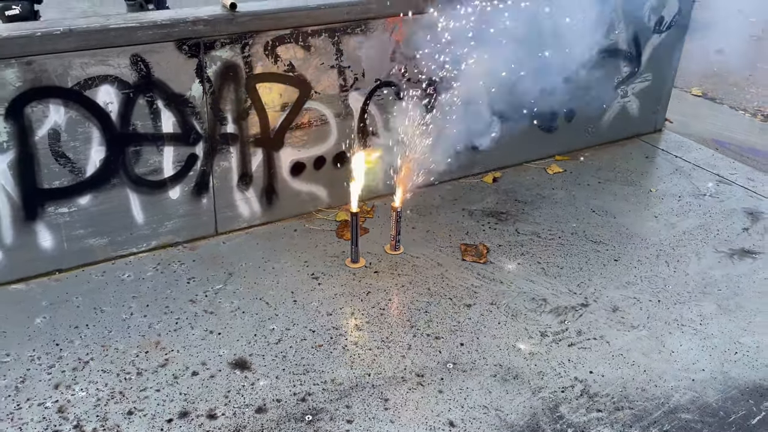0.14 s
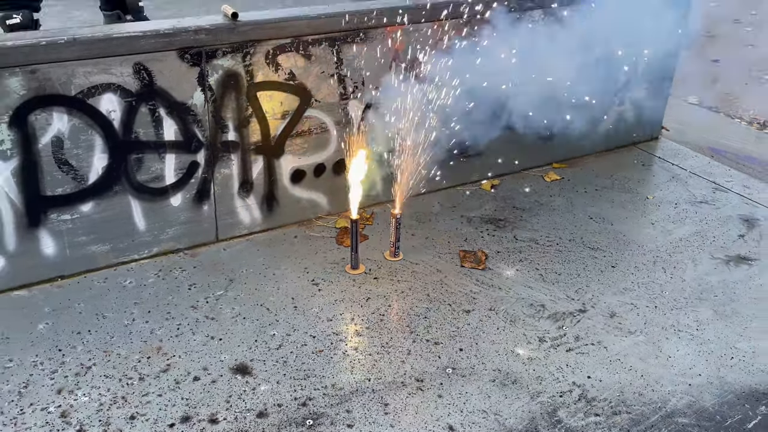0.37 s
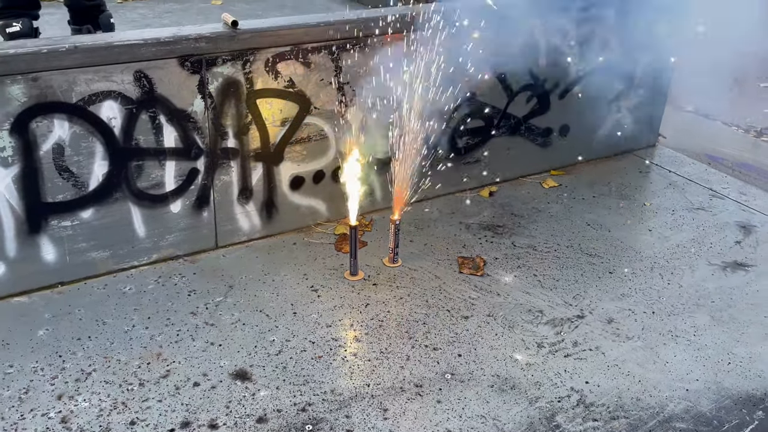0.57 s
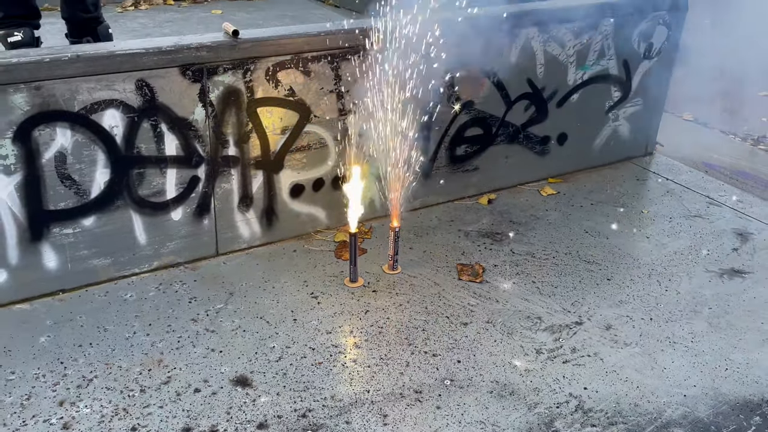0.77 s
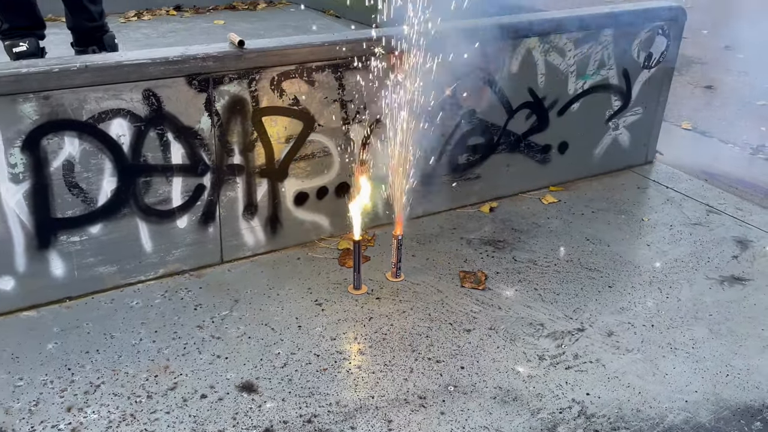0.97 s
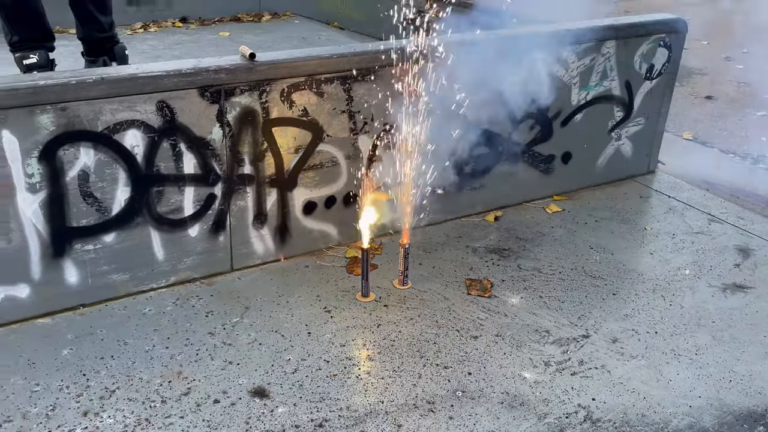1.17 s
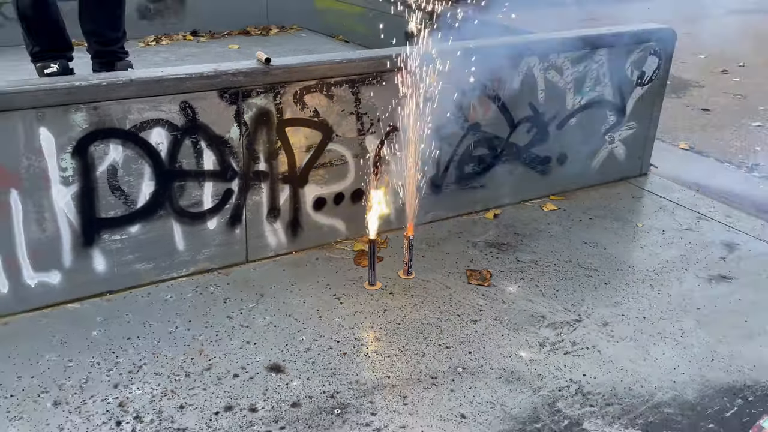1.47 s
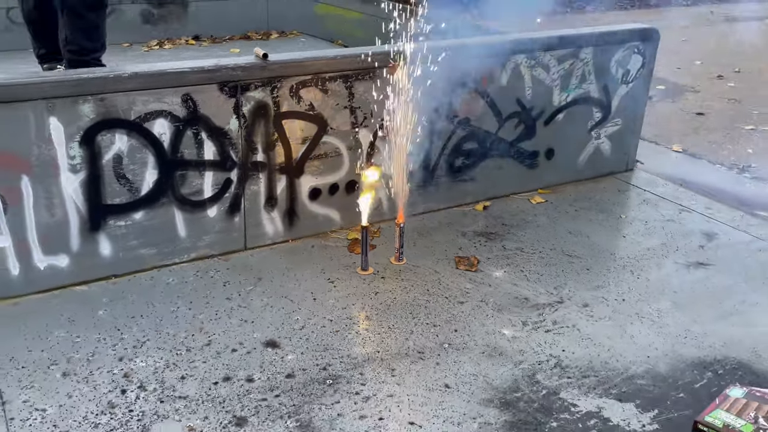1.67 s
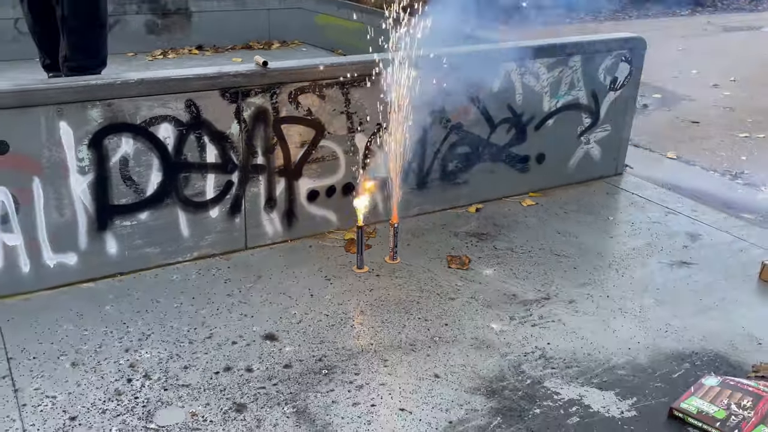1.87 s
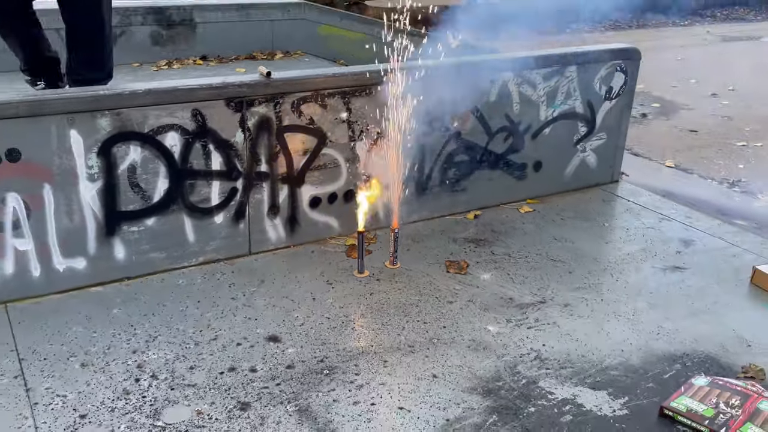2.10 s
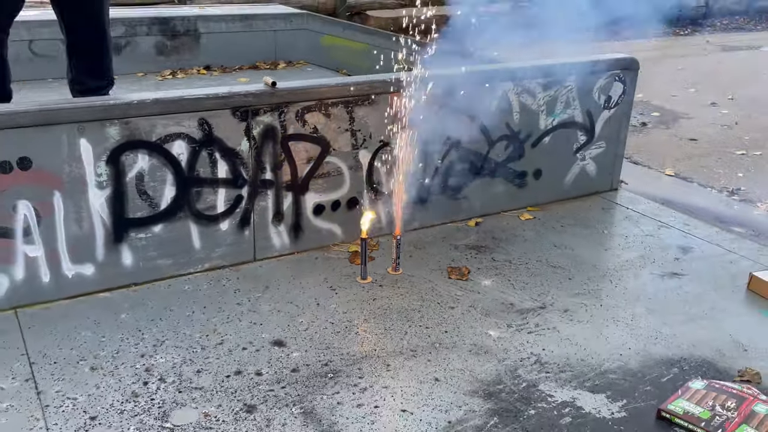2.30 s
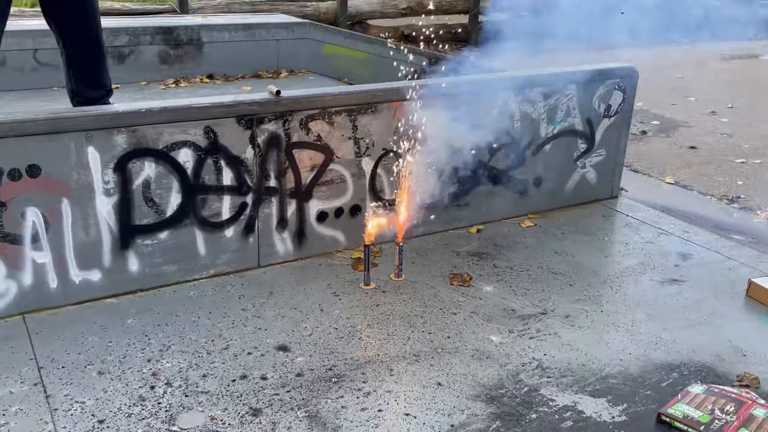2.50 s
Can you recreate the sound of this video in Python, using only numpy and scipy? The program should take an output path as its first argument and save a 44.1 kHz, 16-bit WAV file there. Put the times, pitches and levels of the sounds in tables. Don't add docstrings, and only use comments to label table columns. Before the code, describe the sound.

Fountain firework whistles loudly, its shrill pitch sinking, after a burst of spark hiss, with pops

```python
import sys
import numpy as np
from scipy import signal
from scipy.fft import rfft, irfft, next_fast_len
from scipy.io import wavfile

SR = 44100
rng = np.random.default_rng(int(sys.argv[2]) if len(sys.argv) > 2 else 0)


def store_wav(level_fs):
    pcm = np.round(np.clip(np.atleast_2d(level_fs), -1, 1) * 32767)
    wavfile.write(sys.argv[1], SR, pcm.T.astype(np.int16))


def gain_from_decibels(decibels):
    exponent = np.asarray(decibels, float) / 20
    return 10 ** exponent


N = 116865

# time in seconds, pitch in Hz, fundamental in dB, overtone drive in dB.
WHISTLE_COURSE = [(.46, 4240, -25, -56), (0.483, 4297, -27, -52), (.488, 4264, -19.5, -47),
                  (.51, 4224, -14, -39.5), (.55, 4154, -15.5, -53), (.60, 4200, -17, -45.5),
                  (.64, 4221, -17, -45), (0.691, 4127, -15.5, -45.5), (.70, 4217, -17.5, -50),
                  (.73, 4176, -19, -56), (.775, 4137, -15.5, -48), (0.786, 4125, -17.5, -57.5),
                  (.815, 4118, -19, -45), (.84, 4154, -17, -48.5), (.90, 4117, -18, -49.5),
                  (0.924, 4052, -22.5, -42), (.955, 4160, -17.5, -49), (1.02, 4060, -21, -42.5),
                  (1.035, 4070, -27.5, -40.5), (1.10, 4020, -32.5, -43.5), (1.135, 3940, -16, -40.5),
                  (1.18, 3921, -17.5, -41.5), (1.188, 3893, -18, -49), (1.211, 3890, -18, -45.5),
                  (1.23, 3750, -15, -51), (1.247, 3759, -15.5, -56), (1.256, 3723, -19, -59.5),
                  (1.385, 3669, -23.5, -50.5), (1.409, 3627, -27, -48.5), (1.52, 3583, -22, -45.5),
                  (1.6, 3520, -26, -44.5), (1.629, 3510, -29.5, -43), (1.66, 3503, -26.5, -47),
                  (1.8, 3383, -31.5, -45.5), (1.932, 3336, -34.5, -45), (1.99, 3310, -32.5, -39.5),
                  (2.004, 3268, -25, -42.5), (2.051, 3250, -23, -45.5), (2.13, 3219, -23, -47.5),
                  (2.191, 3250, -28.5, -50), (2.25, 3223, -25.5, -52.5), (2.38, 3221, -28.5, -55.5),
                  (2.419, 3240, -33.5, -59), (2.45, 3256, -41.5, -71.5), (2.485, 3270, -57, -80)]


def rms_one(x):
    return x / np.sqrt(np.mean(x ** 2) + 1e-20)


def in_time(rows):
    s, *columns = np.transpose(rows)
    return [np.interp(np.arange(N) / SR, s, c) for c in columns]


def at_hz(points, hz):
    return np.interp(np.log(hz), np.log(np.array(points)[:, 0]), np.array(points)[:, 1])


def lowpass(x, hz, order):
    return signal.sosfilt(signal.butter(order, hz, fs=SR, output="sos"), x)


def bandpass(x, low, high):
    return signal.sosfilt(signal.butter(2, [low, high], "band", fs=SR, output="sos"), x)


def drift(rate):
    r = np.exp(-40 * np.pi * rate / SR)
    slow = signal.lfilter([1], [1, -2 * r, r * r], rng.standard_normal(N // 20 + 2002))
    slow = slow[2000:]
    return np.interp(np.arange(N) / 20, np.arange(len(slow)), rms_one(slow - slow.mean()))


def banded_noise(spectrum, patchy_db, shared, tilt_db=0):
    out, together = 0, drift(18)
    edges = 28 * 2 ** np.arange(0, 9.3, 1 / 3)
    white = rng.standard_normal((2, N))
    for k, (low, high) in enumerate(zip(edges, edges[1:])):
        hz = np.sqrt(low * high)
        if spectrum[0][0] < hz < spectrum[-1][0]:
            band = bandpass(white[k % 2], low, high)
            flicker_db = patchy_db * (shared * together + drift(27))
            out = out + band * gain_from_decibels(at_hz(spectrum, hz) + tilt_db * np.log2(hz / 2000) + flicker_db)
    top = signal.cheby2(8, 30, 13700 * 1.05, fs=SR, output="sos")
    return rms_one(signal.sosfilt(top, out))


def noise_around(phase, puffs):
    return rms_one(puffs[0] * np.sin(phase) + puffs[1] * np.cos(phase))


def ground(x):
    bounce_s, bounce_db, dull_hz = 0.001009, -5, 6400
    lag = np.arange(N) - bounce_s * SR
    dull = lowpass(x, dull_hz, 1)
    return x + gain_from_decibels(bounce_db) * np.interp(lag, np.arange(N), dull)


def wall(x):
    level_db, t60_s, low_hz, high_hz = -24.5, .3, 1200, 6740
    t = np.arange(int(.3 * SR)) / SR
    tail = rng.standard_normal((2, len(t))) * gain_from_decibels(-60 * t / t60_s) * (t > .003)
    tail = bandpass(tail / np.sqrt(np.sum(tail ** 2) / 2), low_hz, high_hz)
    return gain_from_decibels(level_db) * signal.fftconvolve(x[None], tail, axes=1)[:, :N]


def ports(x):
    # frequency in Hz, phase by which left leads in radians.
    left_lead = [(0, .16), (500, .14), (1100, 0), (1700, -.7), (1850, .8), (2150, .03), (2800, .55),
                 (3200, .5), (4000, .1), (5000, .55), (5700, 0), (6800, -.8), (7900, -3.0), (8200, -3.14),
                 (10000, -4.95), (11200, -6.2), (12200, -6.4), (14200, -8.9), (14600, -9.1), (15200, -9.6),
                 (15700, -10.8), (16200, -11)]
    # frequency in Hz, left over right in dB.
    left_tilt = [(60, 0), (500, 1.3), (1650, 1.5), (3300, 2), (5000, 1.5), (15000, 1)]
    size = next_fast_len(N + 4096)
    hz = np.arange(size // 2 + 1) * SR / size + 1
    lead = np.interp(hz, *np.transpose(left_lead))
    half = np.exp(.5j * lead) * gain_from_decibels(.5 * at_hz(left_tilt, hz))
    return np.array([irfft(rfft(x, size) * h, size)[:N] for h in (half, 1 / half)])


def rumble():
    level_db, top_hz, swing_db = -70, 81, -0.5
    low = bandpass(rng.standard_normal(N), 35, top_hz)
    return gain_from_decibels(level_db + swing_db * drift(5.6)) * rms_one(low)


def air():
    # frequency in Hz, level in dB per Hz.
    air_spectrum = [(18, -54), (30, -38.5), (137, -1.5), (290, -6.5), (400, -26), (2400, -28.5), (3100, 1),
                    (3800, -7), (4600, -19.5), (14000, -21.5)]
    return gain_from_decibels(-62) * banded_noise(air_spectrum, patchy_db=1.5, shared=.15) + rumble()


def sparks():
    # start in seconds, peak in dB.
    spark_events = [(0.9384, -29), (1.0036, -41), (1.5025, -43), (1.577, -43), (1.6341, -54), (1.8073, -38),
                    (1.83, -32.5), (1.8576, -35), (1.8947, -39.5), (1.9548, -35.5), (2.143, -43),
                    (2.185, -40), (2.2043, -40.5)]
    gain_db, rise_s, lag_s = 3.5, .0011, .0025
    out, t = np.zeros(N), np.arange(441) / SR
    hz = 0.912 * in_time(WHISTLE_COURSE)[0]
    spurt = t / rise_s * np.exp(1 - t / rise_s)
    for s, db in spark_events:
        i = int((s + lag_s) * SR)
        tone = np.sin(2 * np.pi * hz[i] * t + rng.uniform(0, 5.7))
        out[i:i + len(t)] += gain_from_decibels(db + gain_db) * spurt * tone
    return out


def spitting():
    # time in seconds, level in dB.
    spit_course = [(.3, -87), (.36, -40.5), (.385, -25.5), (.41, -32.5), (.47, -35.5), (.515, -29),
                   (.55, -36.5), (.6, -34.5), (.72, -91)]
    spits_per_s, low_hz, high_hz = 4000, 2600, 6600
    struck = rng.random(N) < spits_per_s / SR
    size_db = 2.5 * np.minimum(rng.exponential(1, N), 4)
    clicks = struck * gain_from_decibels(size_db) * rng.choice([-1, 1], N)
    band = bandpass(clicks, low_hz, high_hz)
    return gain_from_decibels(in_time(spit_course)[0] + 2.3 * drift(37)) * rms_one(band)


def star_thump(t):
    drop_hz, end_hz, fall_s = 283, 70.6, 0.00564
    fast_s, slow_s, slow_db, lag_s = 0.0046, 0.0087, -8.5, 0.0017
    sweep = 2 * np.pi * np.cumsum(end_hz + drop_hz * np.exp(-(t / fall_s) ** 2)) / SR
    decay = np.exp(-t / fast_s) + gain_from_decibels(slow_db) * np.exp(-t / slow_s)
    thump = np.sin(sweep) * np.minimum(t / 0.0011, 1) * decay
    return np.interp(t - lag_s, t, thump)


def star_boom(t):
    hz, swell_s, lag_s = 76, 0.0048, 0.0077
    boom = -np.sin(2 * np.pi * hz * t) * t / swell_s * np.exp(1 - t / swell_s)
    return np.interp(t - lag_s, t, boom)


def pops():
    pop_starts = [
        0.2473,
        1.364,
        1.7548,
        2.0382,
        2.3443,
    ]
    # crack in dB, crack length in seconds, knock in dB, thump in dB.
    pop_parts = [
        (-18.5, 0.0028, -32, -57),
        (-28.5, 0.0092, -12, -64),
        (-36, 0.0032, -35.5, -37),
        (-30.5, .003, -29, -25),
        (-28.5, 0.0045, -32.5, -21.5),
    ]
    boom_levels = [
        -43,
        -32.5,
        -52,
        -58,
        -55,
    ]
    # frequency in Hz, level of the crack in dB per Hz.
    crack_spectrum = [(300, 4), (1200, -4), (3500, 1.5), (6000, 0), (8000, -2.5), (12000, 0), (14000, -6),
                      (17000, 2)]
    tail_s, tail_db, knock_hz, knock_t60_s = .008, -8.5, 776, 0.0038
    out, t = np.zeros(N + SR), np.arange(SR // 8) / SR
    noise = ground(banded_noise(crack_spectrum, patchy_db=1.2, shared=0))
    thump, boom = star_thump(t), star_boom(t)
    for s, (crack_db, length, knock_db, thump_db), boom_db in zip(pop_starts, pop_parts, boom_levels):
        i = int(s * SR)
        tail = gain_from_decibels(tail_db) * np.exp((length - t) / tail_s)
        burst = np.minimum(t / 0.00032, 1) * np.where(t < length, 1, tail)
        burst *= np.exp(-np.minimum(t, length) / length * .5)
        late = np.maximum(t - 0.58 * length, 0)
        knock = -np.sin(2 * np.pi * knock_hz * late) * gain_from_decibels(-60 * late / knock_t60_s)
        pop = gain_from_decibels(crack_db) * burst * noise[i:i + len(t)] + gain_from_decibels(knock_db) * knock
        out[i:i + len(t)] += pop + gain_from_decibels(thump_db) * thump + gain_from_decibels(boom_db) * boom
    return out[:N]


def jet():
    # time in seconds, vigour in dB.
    vigour_course = [(0, -57.5), (.05, -54.5), (.12, -48), (.3, -45.5), (.38, -43), (.46, -42.5),
                     (.53, -45), (.56, -48), (.62, -50.5), (.71, -57.5), (1.0, -61), (1.2, -61.5),
                     (1.32, -72.5), (1.52, -70), (1.7, -74.5), (2.0, -72), (2.3, -80.5), (2.45, -85),
                     (2.65, -93.5)]
    # frequency in Hz, level in dB per Hz.
    hiss_spectrum = [(260, -49), (450, -16), (884, -15), (1410, -14), (3000, -1.5), (3900, -8), (4700, -4),
                     (6040, -8), (7000, -13.5), (8220, -11), (11900, -15), (15000, -32.5)]
    # frequency in Hz, level in dB per Hz.
    roar_spectrum = [(18, -50), (30, -22), (113, -5), (226, -1.5), (321, -8), (428, -40.5), (600, -16.5),
                     (780, -33.5), (1320, -120)]
    hiss_db, hiss_follows, roar_db, roar_follows = -33, 1, -36, 1.285
    vigour_db = in_time(vigour_course)[0] + 44.5
    dulling_db = 0.2771 * vigour_db
    hiss = banded_noise(hiss_spectrum, patchy_db=0.97, shared=1.4, tilt_db=dulling_db)
    hiss = gain_from_decibels(hiss_db + hiss_follows * vigour_db) * hiss
    roar = banded_noise(roar_spectrum, patchy_db=2.5, shared=0.32)
    return ground(hiss) + gain_from_decibels(roar_db + roar_follows * vigour_db) * roar


def tube_burning(hz):
    # time in seconds, pitch sag as a share, loss in dB, width in seconds.
    choke_events = [(0.529, 0.0027, 3.5, 0.0023), (0.562, 0, 3.5, 0.0051), (0.592, 0.0056, -6, 0.0034),
                    (0.612, 0.013, -1.5, 0.0025), (0.631, 0.0049, 4.5, .006), (.711, 0.0011, 2, 0.0033),
                    (0.828, 0.042, 8.5, 0.0027), (0.914, 0.0011, 4.5, 0.0018), (.942, 0.012, 3, 0.0027),
                    (1.065, .004, -2.5, 0.0029), (1.074, 0.0065, -0.5, 0.0033), (1.37, 0.0023, 4.5, .003),
                    (1.635, 0.0079, 0.5, .002), (1.809, 0.0047, -1.5, 0.0021), (1.865, 0, 1.5, 0.0021),
                    (1.925, 0.0018, 0, 0.0035), (1.985, 0, 6.5, 0.0031), (2.035, .0, 3, .005),
                    (2.067, .0, 2, .004), (2.095, 0.0022, -0.5, .005)]
    t = np.arange(N) / SR
    level_db = 0.5 * (drift(2.5) + 2.0 * drift(83))
    hz = hz * (1 + .001 * (drift(17) + 1.6 * drift(84)) + 0.002 * drift(200))
    for s, sag, choke_db, width in choke_events:
        bump = np.exp(-.5 * ((t - s) / width) ** 2)
        hz = hz * (1 - sag * bump)
        level_db = level_db - choke_db * bump
    return hz, level_db


def whistle():
    # time in seconds, period-doubling strength in dB.
    doubling_course = [(.6, -105), (.655, -52.5), (.67, -35.5), (.70, -44.5), (.73, -35.5), (.78, -30),
                       (.9, -27), (1.15, -33.5), (1.21, -36), (1.29, -53.5), (1.36, -110)]
    # multiple of the pitch, level in dB over the overtone drive.
    overtones = [(2, 8.5), (3, 4), (4, -9.5)]
    # multiple of the pitch, level in dB over the doubling.
    half_tones = [(.5, -14), (1.5, 0.5), (2.5, -10.5), (3.5, -23)]
    # frequency in Hz, level in dB.
    overtone_colour = [(6000, 0.5), (6900, 2.5), (8500, 6), (10100, -4.5), (11000, 5), (12500, -3.5),
                       (14000, -4.5), (15700, 10.5)]
    # multiple of the pitch, level in dB.
    breath_modes = [(1.5, -3), (2.5, -4), (3.5, -8)]
    # frequency in Hz, level in dB per Hz.
    flame_spectrum = [(4400, -15.5), (5500, 2.5), (7000, 0), (9500, -4), (12500, -7), (14500, -20.5)]
    skirt_db, skirt_hz, upper_skirt_db, upper_skirt_pitch = -26.5, 345, -6.5, 1.13
    rasp_db, rasp_hz, breath_db, breath_hz = 2, 134, -15, 160
    flame_db, flame_follows = -46.5, 0.39
    t = np.arange(N) / SR
    hz, db, drive_db = in_time(WHISTLE_COURSE)
    half_db, = in_time(doubling_course)
    hz, level_db = tube_burning(hz)
    phase = 2 * np.pi * np.cumsum(hz) / SR
    alight = np.minimum(t - WHISTLE_COURSE[0][0], WHISTLE_COURSE[-1][0] - t)
    alight = np.clip(alight / 0.012, 0, 1)

    puffs = lowpass(rng.standard_normal((2, N)), skirt_hz, 4)
    skirt = gain_from_decibels(skirt_db + 4.5 * drift(60)) * noise_around(.85 * phase, puffs)
    upper = rms_one(puffs[1] * np.sin(upper_skirt_pitch * phase))
    skirt += gain_from_decibels(skirt_db + upper_skirt_db + 4.8 * drift(60)) * upper

    puffs = lowpass(rng.standard_normal((2, N)), rasp_hz, 4)
    rasp = gain_from_decibels(rasp_db + drive_db + 1.9 * drift(40)) * noise_around(phase, puffs)
    out = gain_from_decibels(db) * np.sqrt(2) * np.sin(phase) + rasp
    for rows, source_db in ((overtones, drive_db), (half_tones, half_db)):
        for multiple, rel_db in rows:
            tone_db = source_db + rel_db + at_hz(overtone_colour, multiple * hz) + 1.5 * drift(45)
            audible = multiple * hz < 16000
            out += np.sqrt(2) * gain_from_decibels(tone_db) * np.sin(multiple * phase) * audible
    for multiple, rel_db in breath_modes:
        puffs = lowpass(rng.standard_normal((2, N)), breath_hz, 2)
        mode_db = breath_db + rel_db + drive_db + 3.0 * drift(8)
        out += gain_from_decibels(mode_db) * noise_around(multiple * phase, puffs)
    out += gain_from_decibels(flame_db + flame_follows * db) * banded_noise(flame_spectrum, patchy_db=.7, shared=.5)
    return out * gain_from_decibels(level_db) * alight, gain_from_decibels(0.72 * db - 11) * skirt * alight


def scene():
    tones, skirt = whistle()
    fire = tones + jet() + ground(skirt + spitting()) + sparks() + pops()
    return ports(fire + air()) + wall(fire)


def low_pass(x):
    return signal.sosfilt(signal.butter(12, 16600, fs=SR, output="sos"), x)


def record(dry):
    mix = signal.sosfilt(signal.butter(2, 40, "high", fs=SR, output="sos"), dry)
    return low_pass(mix)


dry = scene()
out = record(dry)
store_wav(out)
```